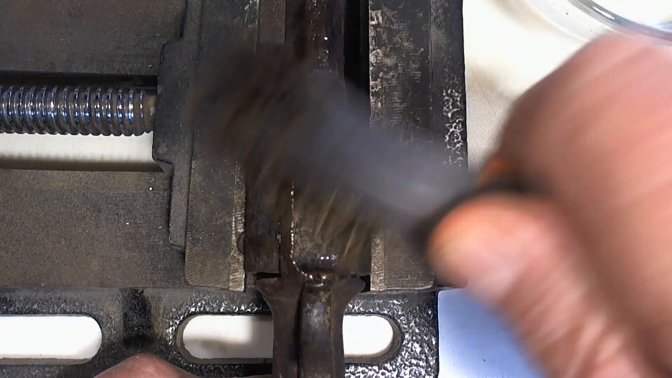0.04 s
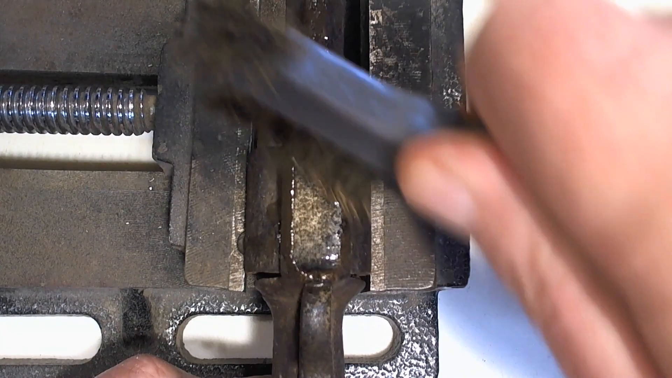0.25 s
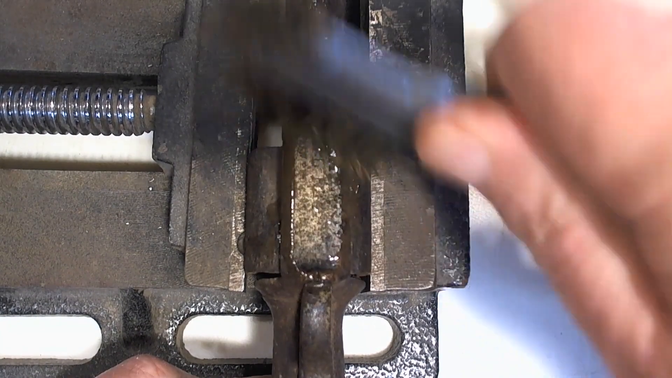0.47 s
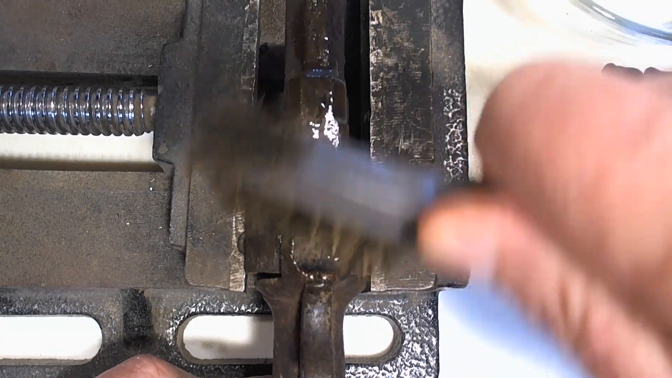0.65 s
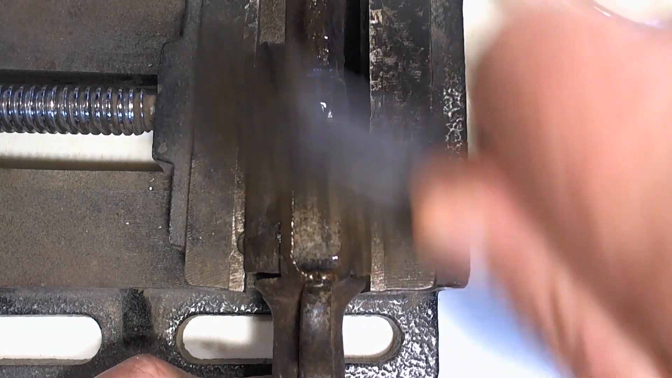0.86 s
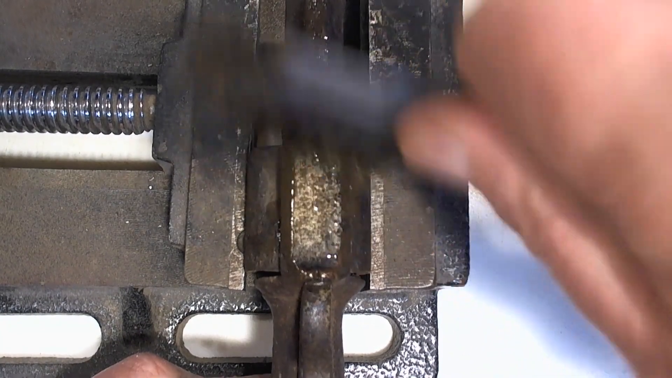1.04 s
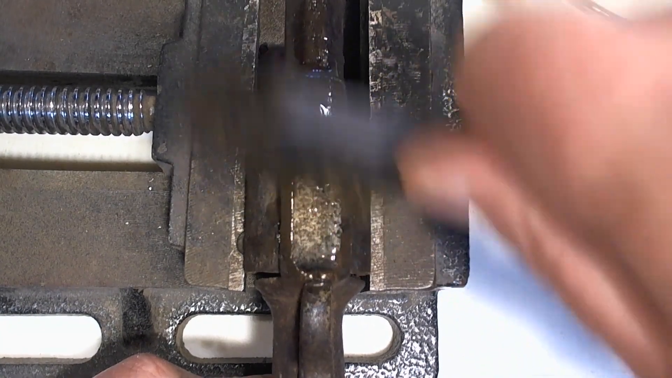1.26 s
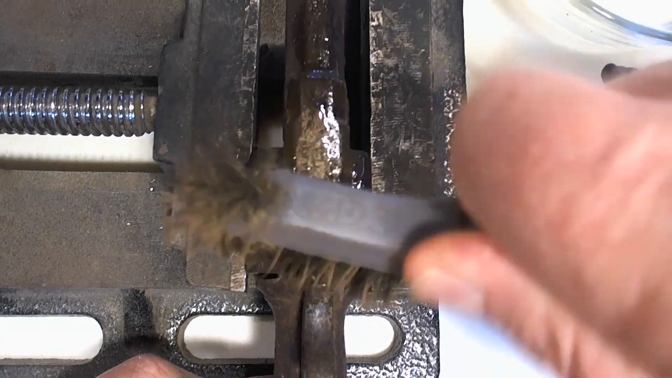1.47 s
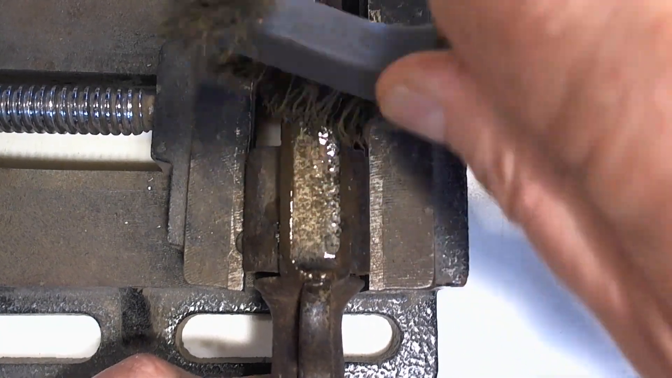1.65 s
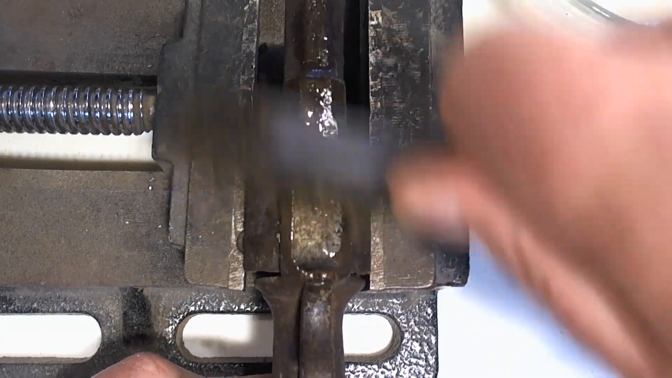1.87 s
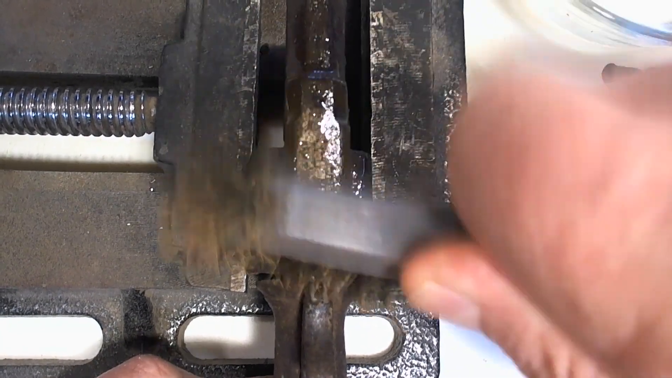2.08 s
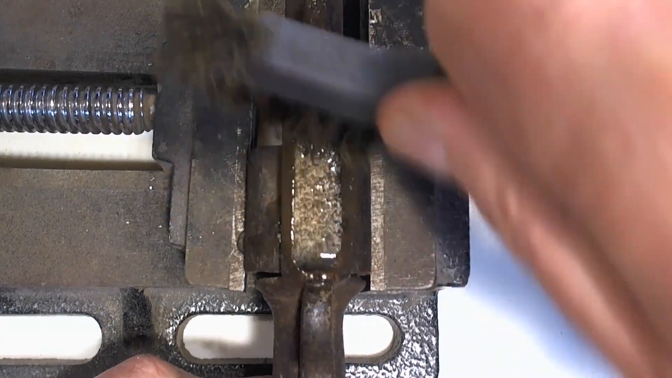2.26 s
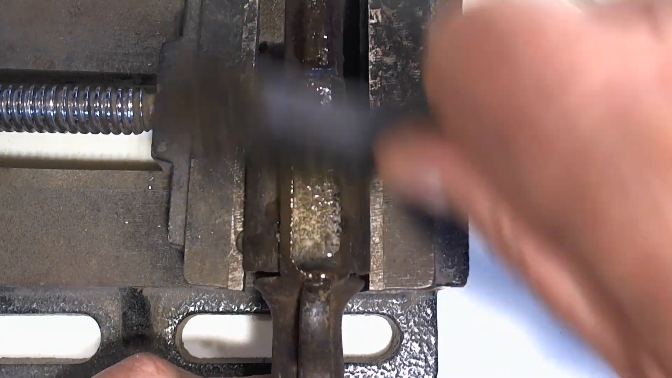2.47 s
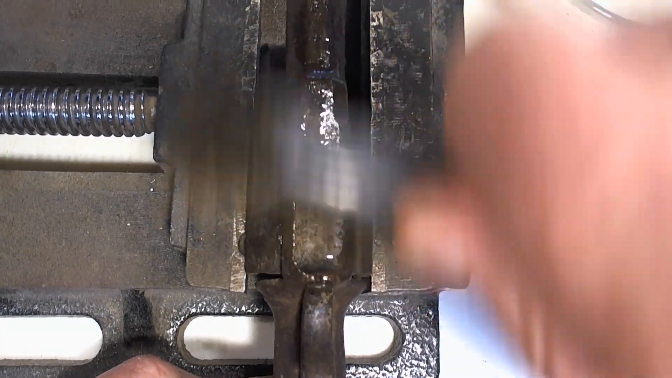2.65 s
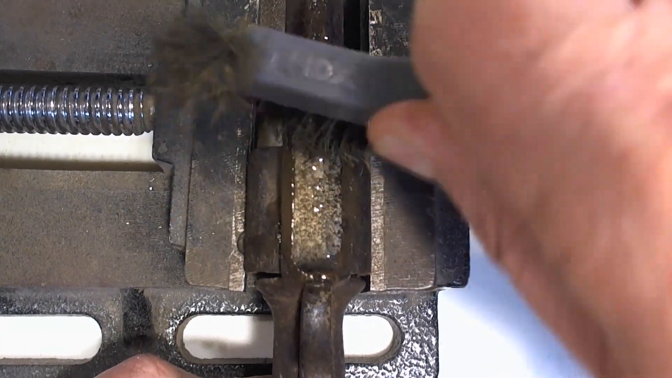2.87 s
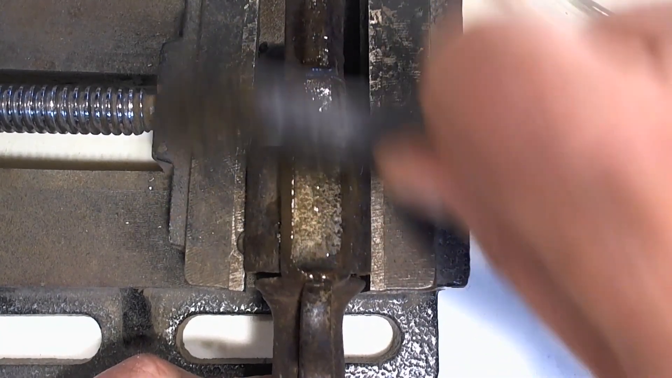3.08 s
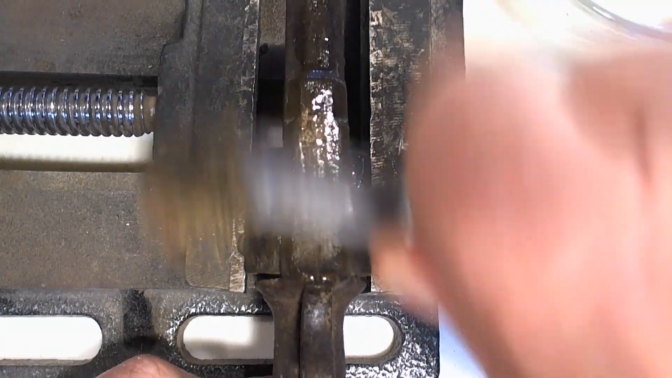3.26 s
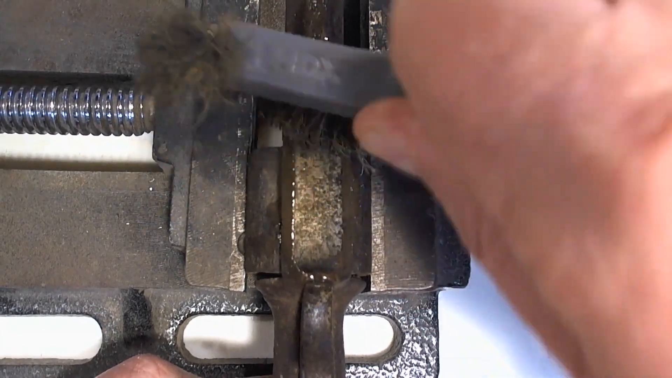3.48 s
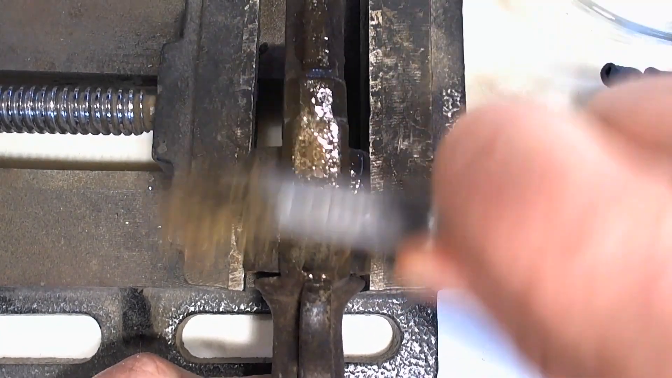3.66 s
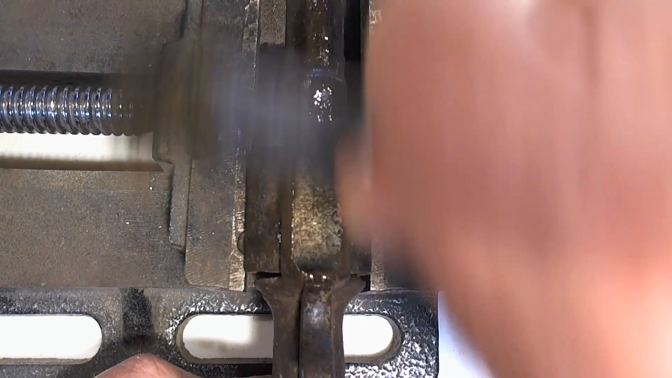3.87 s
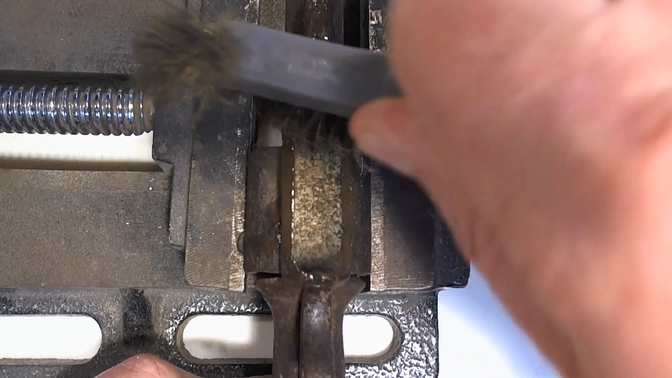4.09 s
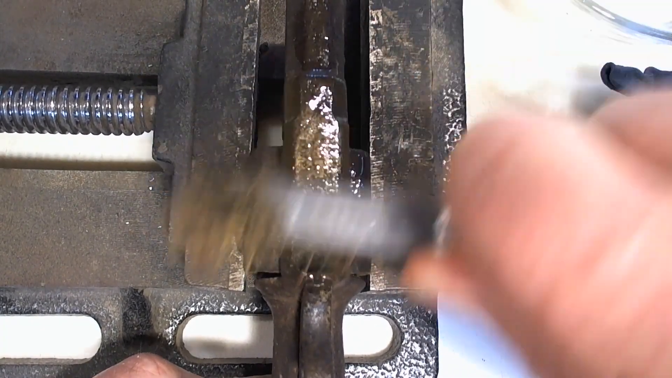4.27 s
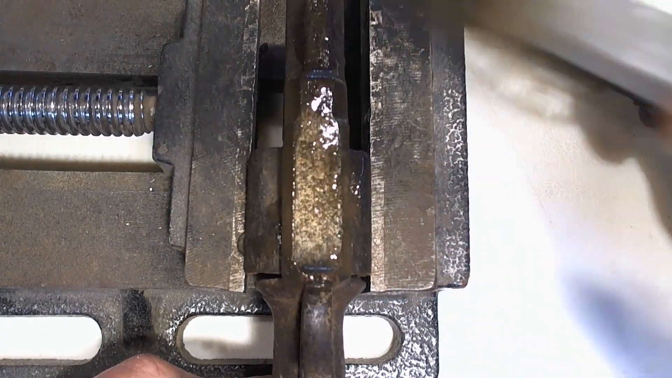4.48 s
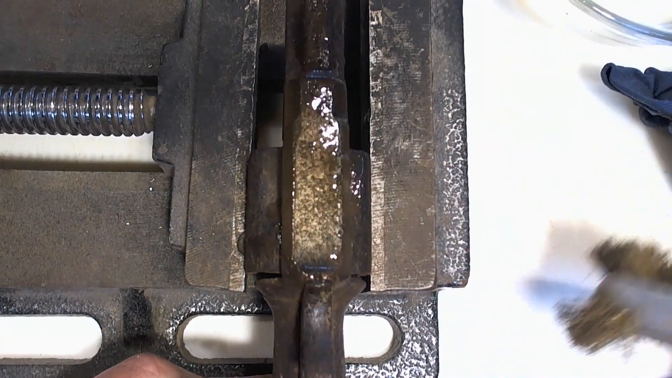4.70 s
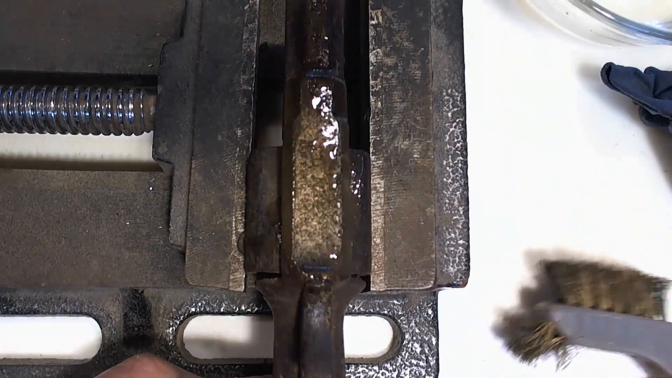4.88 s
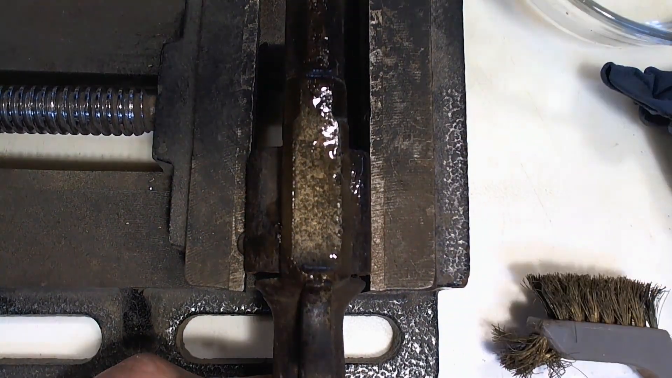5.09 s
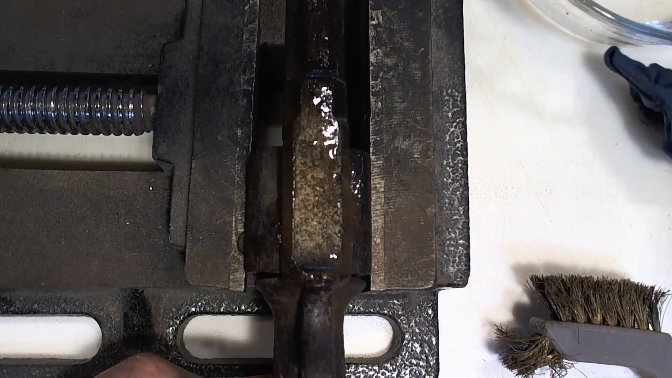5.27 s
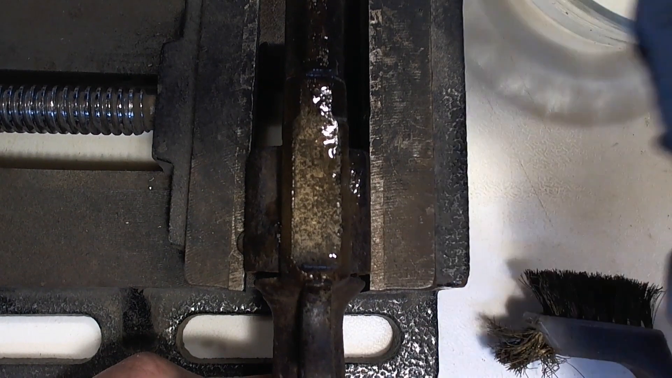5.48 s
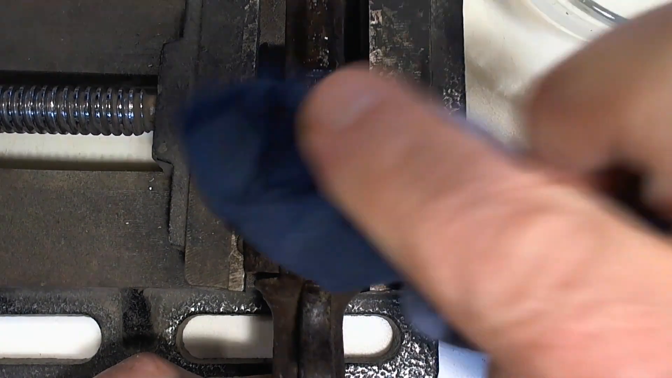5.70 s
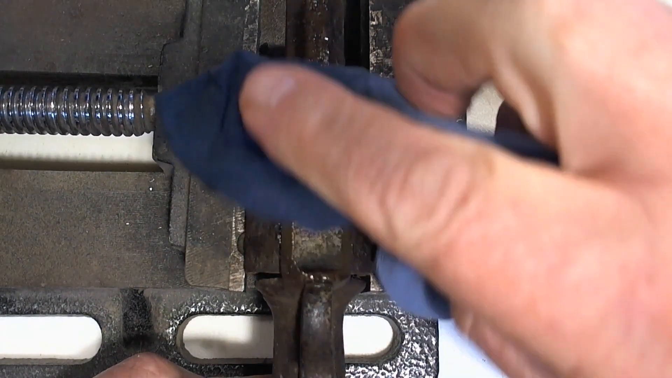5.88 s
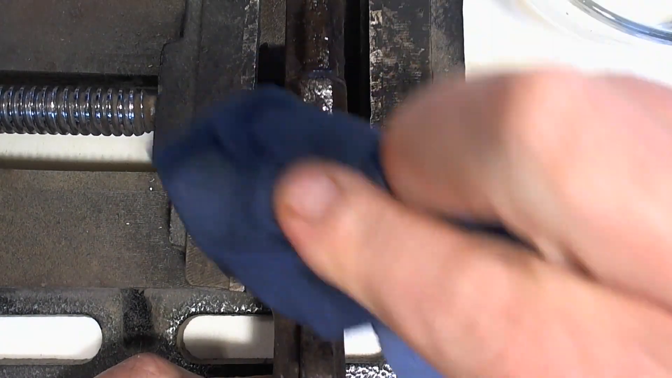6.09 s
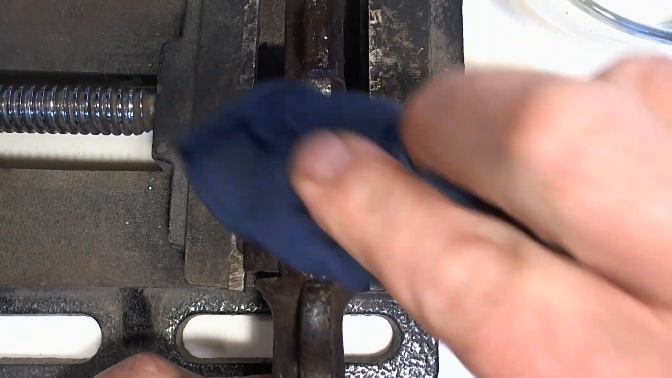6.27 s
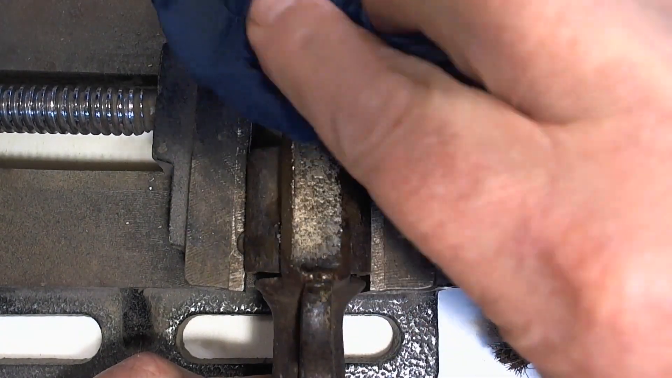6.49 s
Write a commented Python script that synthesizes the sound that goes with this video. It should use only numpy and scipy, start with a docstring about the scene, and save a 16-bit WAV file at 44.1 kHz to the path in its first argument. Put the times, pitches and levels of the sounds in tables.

```python
"""In a small workshop, close to the microphone, a steel wire brush scrubs a rusty metal part held in a vise.
Wire tips strike the rust as random impacts, spring free as tiny damped pings, and excite the modes of part,
vise and bench, stroke after stroke. The brush is laid down in bristle ticks and a rag, shaped impact noise,
is picked up; a hard knock, a sum of damped modes, sounds on the bench before the rag wipes the part.
Still air, as shaped noise, and a mains hum lie underneath."""
import sys
import numpy as np
from scipy import signal
from scipy.fft import rfft, irfft, next_fast_len
from scipy.io import wavfile
from scipy.ndimage import map_coordinates

SR = 44100
rng = np.random.default_rng(int(sys.argv[2]) if len(sys.argv) > 2 else 0)


def output_pcm(signal):
    """Save a mono or channel-first signal as 16-bit PCM at the path in sys.argv[1].

    Samples are clipped to [-1, 1] before scaling.
    """
    pcm = np.clip(np.atleast_2d(signal).T, -1, 1) * 32767
    wavfile.write(sys.argv[1], SR, np.round(pcm).astype(np.int16))


N = 288414  # length in samples


def amp(db):
    """Level to amplitude: twenty decibels to each factor of ten."""
    return 10 ** (np.asarray(db) / 20)


def unit(x):
    """Normalisation to a root-mean-square value of 1."""
    return x / np.sqrt(np.mean(x ** 2) + 1e-20)


def clock():
    """The time of every sample in seconds."""
    return np.arange(N) / SR


def along(points, hz):
    """Interpolation of (Hz, value) points on a logarithmic frequency axis."""
    f, v = np.transpose(points)
    return np.interp(np.log(hz + 1), np.log(f + 1), v)


def curves(rows):
    """Linear interpolation in time: one value per sample for each column after the time."""
    s, *cols = np.transpose(rows)
    return [np.interp(clock(), s, c) for c in cols]


def wobble(rate):
    """Slow random modulation: a smooth curve through random knots, rate of them a second."""
    knots = rng.standard_normal(int(N * rate / SR) + 4)
    return map_coordinates(knots, [clock() * rate])


def arch(s, length):
    """Half a sine: the speed of one sweep of the hand, from rest to rest."""
    return np.abs(np.sin(np.pi * np.clip((clock() - s) / length, 0, 1)))


def add(track, s, sound):
    """Superposition: mix a sound into a track at time s."""
    part = track[round(s * SR):][:len(sound)]
    part += sound[:len(part)]


def filtered(x, response):
    """Linear filtering: the spectrum of x times a complex response of frequency."""
    size = next_fast_len(N + SR // 2)
    return irfft(rfft(x, size) * response(np.fft.rfftfreq(size, 1 / SR)), size)[:N]


def coloured(x, spectrum):
    """Spectral shaping: x weighted by a curve of (Hz, dB) points, at rms 1."""
    return unit(filtered(x, lambda hz: amp(along(spectrum, hz))))


def catches(rate, spread_db):
    """Shot noise: random tiny impacts of uneven size and either sign, rate a second, at rms 1."""
    hit = rng.random(N) < rate / SR
    size = np.clip(rng.standard_normal(N), -2, 2)
    return unit(hit * rng.choice([-1, 1], N) * amp(spread_db * size))


def ring(hz, t60, attack):
    """Free decay of one struck mode: a sine that falls 60 dB in t60 seconds after a soft attack."""
    t = np.arange(SR // 5) / SR
    decay = np.exp(-np.log(1000) * t / t60)
    return np.sin(2 * np.pi * hz * t) * decay * (1 - np.exp(-t / attack))


def rung(x, modes, edge_hz):
    """Modal resonance: x drives (Hz, width, dB) modes, weak above an edge; white noise keeps its level."""
    def response(hz):
        body = sum(amp(db) * 1j * hz * w / (c * c - hz * hz + 1j * hz * w) for c, w, db in modes)
        body = body * signal.freqs(*signal.butter(8, 1, analog=True), hz / edge_hz)[1]
        return body / np.sqrt(np.mean(np.abs(body) ** 2))
    return filtered(x, response)


# Spectrum of the still air. Each row: frequency in Hz, relative density in dB.
AIR_SPECTRUM = [(12, -26), (20, -8), (92, -7.5), (131, -6.5), (152, -14), (182, -16), (415, -17.5),
                (483, -19.5), (534, -20), (605, -19.5), (703, -21.5), (6550, -30.5), (8000, -34),
                (10400, -68), (17600, -120)]


def workshop():
    """Stationary background: shaped air noise and a 120 Hz mains hum with slightly unsteady phase and level."""
    air = coloured(rng.standard_normal(N), AIR_SPECTRUM)
    hum = np.sin(2 * np.pi * 120 * clock() + 0.23 * wobble(3.6)) * amp(0.92 * wobble(2.9))
    return amp(-62.0) * air + amp(-64.5) * hum


def handling_bump():
    """Impulsive excitation: as a stroke ends, the brush handle bumps and the bench thumps in two damped low modes."""
    out = np.zeros(N)
    thump = amp(-37.0) * ring(122, t60=0.083, attack=0.0031)
    thump = thump + amp(-41) * ring(257, t60=0.049, attack=.003)
    add(out, .001, thump)
    return out


# Brush strokes, pull and push in turn. Each row: start in seconds, relative grinding level in dB,
# relative level of the wire pings in dB, centre pitch of the pings in Hz.
BRUSH_STROKES = [(0.028, -52, -57, 6400), (0.196, -45, -41, 6450), (0.34, -48, -47, 6700),
                 (0.452, -42, -42, 6300), (0.591, -47, -40.8, 6850), (0.737, -43, -38.5, 6530),
                 (0.877, -46.5, -40.4, 6600), (1.022, -42, -36, 6900), (1.155, -45, -40, 6530),
                 (1.312, -42, -34, 6680), (1.447, -46, -33.5, 6780), (1.606, -43, -29, 6490),
                 (1.751, -45.5, -33.7, 6400), (1.907, -44, -28.5, 6600), (2.041, -45.5, -34.5, 5820),
                 (2.205, -43.5, -29.5, 6700), (2.345, -45, -34.5, 5840), (2.505, -42.5, -29.5, 7000),
                 (2.669, -44.5, -35.7, 6660), (2.822, -44, -33, 6250), (2.979, -42.5, -29.5, 6960),
                 (3.124, -43.5, -36, 6730), (3.289, -42, -32, 7070), (3.443, -43.5, -36.5, 6650),
                 (3.593, -44, -32, 6750), (3.75, -41.5, -37.5, 5640), (3.896, -44, -32, 6750),
                 (4.074, -42, -37, 6460), (4.212, -48.5, -41.5, 6330)]
# How the contact changes as the hand shifts along the part. Each row: time in seconds,
# relative bench level in dB, relative ring of the part in dB, relative rustle at the turns in dB.
HAND_CONTACT = [(0.02, 6, 0, -57), (.42, 0.5, 0.5, -47), (1.1, -1, -1, -58.5), (1.8, 0, 2, -57),
                (2.35, -1, 0, -68), (2.9, -3, -2, -54), (3.35, -2, -6.5, -57.5), (3.75, -1.5, -1.5, -44.5),
                (4.25, -3.5, -3.5, -52.5)]
LIFT_OFF_S = 4.3  # the last stroke ends
PULL_PEAK, PUSH_PEAK = 0.44, 0.64  # share of a stroke gone by when the hand is fastest
PULL_SHAKE_DB, PUSH_SHAKE_DB = 0.37, 1.5  # shaking of the vise over the grinding
PUSH_BENCH_DB = 1  # pushes bear down harder on the bench
EASE_DB = -6  # the hand eases off before each push, so that turn is quieter


def scrubbing():
    """Stick-slip friction: force follows hand speed, which peaks later in pushes; pings grow fastest with it."""
    t = clock()
    start, grind_db, ping_db, ping_hz = np.transpose(BRUSH_STROKES)
    bench_db, part_db, turn_db = curves(HAND_CONTACT)
    push = np.arange(len(start)) % 2 == 1
    length = np.diff(np.r_[start, LIFT_OFF_S])
    fastest = start + length * np.where(push, PUSH_PEAK, PULL_PEAK)
    vise_db = grind_db + np.where(push, PUSH_SHAKE_DB, PULL_SHAKE_DB)
    # travel counts strokes: half of one up to the fastest point, half after it
    marks = np.sort(np.r_[start, fastest, LIFT_OFF_S])
    travel = np.interp(t, marks, np.arange(len(marks)) / 2)
    stroke = np.minimum(travel.astype(int), len(start) - 1)
    speed = np.abs(np.sin(np.pi * travel))
    # bent wires keep rustling while the hand turns round
    rustle = amp(turn_db + np.interp(t, start, EASE_DB * push)) * (t < LIFT_OFF_S)
    # whole tufts grip and let go together, most jerkily when the brush is slow
    grip = amp((1.44 - speed) * (1.73 * wobble(70) + 1.5 * wobble(420)))

    def force(db, power, turn):
        """Power law of speed, summed in energy with the rustle and modulated by the grip."""
        return grip * np.hypot(amp(db[stroke]) * speed ** power, turn * rustle)

    grind = force(grind_db, power=1.56, turn=0.64)
    shake = force(vise_db, power=1.24, turn=0.64)
    # the pings crest sharply in mid-stroke, where the wires bend furthest
    crest = 1 - np.abs(2 * (travel % 1) - 1)
    spring = amp(-3.5 + 3.26 * crest) * force(ping_db, power=2.3, turn=1.33)
    bench_gain = amp(bench_db + PUSH_BENCH_DB * push[stroke])
    return grinding(grind, part_db) + springing_wires(spring, ping_hz[stroke]) + shaking(shake, bench_gain)


# Spectrum of the grit. Each row: frequency in Hz, relative density in dB.
GRIT_SPECTRUM = [(30, -18.5), (200, -14), (900, -11.5), (1200, -7.5), (1800, -1), (2500, 0.5), (3300, 3.5),
                 (4400, 5.5), (5300, 1.5), (7400, -2), (9000, -13.5)]
# Modes of the clamped part. Each row: frequency in Hz, width in Hz, relative level in dB.
PART_MODES = [(1330, 37, -12.5), (1544, 160, -9.5), (2070, 130, -10), (2310, 150, -7.5), (2645, 210, -5),
              (3400, 110, -11), (3840, 62, -7.5), (4180, 95, -1.5), (4377, 99, 3)]


def grinding(grind, part_db):
    """Random impact excitation: wire tips break off rust and ring the modes of the part."""
    grit = amp(2.5) * grind * coloured(catches(rate=5000, spread_db=3.5), GRIT_SPECTRUM)
    strikes = grind * amp(part_db) * catches(rate=5000, spread_db=1.5)
    return grit + rung(strikes, PART_MODES, edge_hz=4940)


def pings(rate, pitch_hz, scatter, life, spread_db):
    """Elastic release: wires spring free as short damped sines scattered round a moving pitch, at rms 1."""
    count = int(rate * N / SR)
    start = rng.integers(0, N, count)
    pitch, size, hold = np.clip(rng.standard_normal((count, 3)), -2.2, 2.2).T[:, :, None]
    k = np.arange(256)  # samples in each ping
    hz = pitch_hz[start, None] * np.exp(scatter * pitch)
    wave = amp(spread_db * size) * np.sin(2 * np.pi * hz * k / SR)
    wave = wave * np.exp(-k / SR / (life * np.exp(0.32 * hold)))
    return unit(np.bincount((start[:, None] + k).ravel(), wave.ravel())[:N])


# Spectrum of the springing wires. Each row: frequency in Hz, relative density in dB.
WIRE_SPECTRUM = [(1500, -32), (3500, -1.5), (5000, -0.5), (6200, 3), (7400, 1.5), (9000, -3.5)]


def springing_wires(spring, pitch_hz):
    """Elastic release in number: a dense shower of pings, shaped in spectrum and following the stroke."""
    shower = pings(rate=3200, pitch_hz=pitch_hz, scatter=0.11, life=0.00053, spread_db=4.5)
    return spring * coloured(shower, WIRE_SPECTRUM)


# Modes of the vise. Each row: frequency in Hz, width in Hz, relative level in dB.
VISE_MODES = [(560, 6.8, -15.5), (608, 41.5, -1.5), (707, 29, -5), (767, 45, -6), (884, 77, -4),
              (938, 50, 0), (971, 47, 3.5), (973, 44, -7.5)]
# The jaw drones when the brush bears on the far end. Each row: time in seconds, relative level in dB.
JAW_DRONE = [(0, -26), (3.4, -19.5), (3.8, -7.5), (4.25, -10.5)]
# Low modes of the bench top. Each row: frequency in Hz, width in Hz, relative level in dB.
BENCH_MODES = [(42.6, 8.8, -2.5), (57, 14.4, 3), (118.3, 21, -1), (174.6, 23, 0.5), (230.6, 12.8, 2),
               (278, 13, 1), (301.6, 12, -2.5), (344, 44, -13.5), (397, 20, -19.5)]


def shaking(shake, bench_gain):
    """Structure-borne sound: the drag of the brush shakes the vise and its jaw and, through it, the bench."""
    vise_drive = amp(-1.0 + 1.54 * wobble(55)) * shake * catches(rate=5000, spread_db=2.5)
    vise = rung(vise_drive, VISE_MODES, edge_hz=980)
    jaw_drive = shake * amp(curves(JAW_DRONE)[0]) * catches(rate=3400, spread_db=4.5)
    jaw = rung(jaw_drive, [(607.4, 16, 0)], edge_hz=840)
    bench_drive = amp(-6.0) * shake * bench_gain * catches(rate=5000, spread_db=2.5)
    return vise + jaw + rung(bench_drive, BENCH_MODES, edge_hz=448)


# Single wires that snag and spring free. Each row: time in seconds (the snap follows 1.5 ms later),
# relative level in dB, pitch in Hz.
WIRE_FLICKS = [(0.0776, -21.5, 4500), (0.2443, -21.5, 4200), (0.7485, -31, 4440), (1.0285, -24, 4440),
               (1.332, -32, 4420), (1.4634, -25, 6240), (1.6352, -32, 6000), (1.8672, -18.5, 7000),
               (1.91, -31, 6150), (2.091, -14.5, 5870), (2.209, -24, 4970), (2.5274, -29, 5940),
               (2.8942, -11, 6360), (2.8979, -8.5, 6100), (3.1463, -31, 4350), (3.309, -27, 7300),
               (3.7539, -23.5, 5500), (4.0846, -27, 5800)]


def flicks():
    """Sudden release of stored energy: a snagged wire snaps with a tiny crack and rings a few milliseconds."""
    rings, cracks = np.zeros(N), np.zeros(N)
    t = np.arange(SR // 20) / SR
    for s, db, hz in WIRE_FLICKS:
        add(rings, s + 0.001497, amp(db + 0.5) * ring(hz, t60=0.0045, attack=0.00023))
        add(cracks, s + .0015, amp(db - 14) * np.exp(-t / 0.0018))
    return rings + cracks * coloured(rng.standard_normal(N), WIRE_SPECTRUM)


# Bristles brush past and drag on the bench. Each row: start in seconds, length in seconds, relative level in dB.
BRISTLE_DRAGS = [(4.462, .07, -52), (4.731, .125, -41), (4.942, .01, -40.5)]
# Spectrum of the bristles. Each row: frequency in Hz, relative density in dB.
BRISTLE_SPECTRUM = [(100, -21), (500, -31), (760, 7), (980, 7), (1250, -15), (1750, 6), (2300, -2.5),
                    (3800, 3.5), (6000, 6), (8000, -5)]
# from one bristle letting go to the next, the random shift of that moment, and each tick's decay
TICK_GAP_S, TICK_SCATTER_S, TICK_DECAY_S = .0145, 0.0027, 0.0049


def brush_laid_down():
    """Stick-slip release: bristles let go one by one and ring the vise, a wire sings, the brush bumps softly."""
    bursts, out = np.zeros(N), np.zeros(N)
    t = np.arange(SR // 10) / SR
    for start, length, db in BRISTLE_DRAGS:
        for s in np.arange(start, start + length, TICK_GAP_S):
            late, size = rng.standard_normal(2)
            shift = TICK_SCATTER_S * late * (s > start)  # the first tick is on time
            add(bursts, s + shift, amp(db - 5.5 + 0.97 * size) * np.exp(-t / TICK_DECAY_S))
    add(out, 4.911, amp(-49.0) * ring(2940, t60=0.07, attack=0.00099))  # the singing wire
    add(out, 4.922, amp(-43.0) * ring(164, t60=0.051, attack=.003))  # the bump
    vise_ring = rung(amp(-9) * bursts * rng.standard_normal(N), [(797, 42, 0), (920, 68, 0)], edge_hz=1140)
    bristles = amp(-1) * bursts * coloured(catches(rate=9900, spread_db=7), BRISTLE_SPECTRUM)
    return out + vise_ring + bristles


# The rag is picked up, then wipes to and fro. Each row: start in seconds, length in seconds,
# relative rub level in dB.
RAG_RUBS = [(5.133, .15, -55), (5.27, 0.32, -58.5), (5.638, 0.12, -57.5), (5.722, 0.17, -53.5),
            (5.92, 0.2, -48.5), (6.048, 0.33, -51.5), (6.225, 0.21, -44.5), (6.474, 0.19, -47.5)]
# Spectrum of the rag. Each row: frequency in Hz, relative density in dB.
RAG_SPECTRUM = [(40, -22), (120, -14), (170, 3.5), (260, -6), (450, -9.5), (900, -2.5), (1250, -8.5),
                (2000, -5), (3200, -1.5), (4400, -0.5), (5300, -2.5), (6600, -1.5), (8000, -12.5)]
# Faint squeaks as the rag turns round. Each row: start in seconds, length in seconds, pitch in Hz,
# relative level in dB.
RAG_SQUEAKS = [(5.857, 0.077, 3100, -64.5), (6.417, 0.096, 3160, -68)]
RUB_POWER = 0.79  # exponent of the rag's amplitude against hand speed


def wiping():
    """Sliding friction: rubs swell with hand speed; the cloth stirs the vise, bumps the bench, squeaks at turns."""
    rub = np.sqrt(sum((amp(db) * arch(s, length) ** RUB_POWER) ** 2 for s, length, db in RAG_RUBS))
    rub = rub * amp(1.15 * wobble(120) + 1.1 * wobble(30))
    fibres = amp(-0.5) * rub * coloured(catches(rate=9000, spread_db=3.5), RAG_SPECTRUM)
    vise_drive = amp(-18 + 4.6 * wobble(35)) * rub * rng.standard_normal(N)
    vise = rung(vise_drive, VISE_MODES, edge_hz=960)
    bumps = rung(amp(-14.5) * rub * catches(rate=60, spread_db=4), BENCH_MODES, edge_hz=450)
    squeaks = np.zeros(N)
    for s, length, hz, db in RAG_SQUEAKS:
        squeal = amp(db) * arch(s, length) * rng.standard_normal(N)
        squeaks += rung(squeal, [(hz, 110, 0)], edge_hz=4900)
    return fibres + vise + bumps + squeaks


# The knock and its early reflections. Each row: time in seconds, relative level in dB.
KNOCK_BLOWS = [(5.3521, -19), (5.365, -49), (5.374, -38)]
# Modes of the hard knock on the bench. Each row: frequency in Hz, relative level in dB,
# 60 dB decay time in seconds.
KNOCK_MODES = [(250, -13.5, 0.016), (814, -15.5, 0.077), (1014, -19.5, 0.051), (1660, -14, 0.034),
               (1950, -4, 0.014), (2564, 3, 0.019), (3920, 2.5, 0.0053)]


def knock():
    """Impact of hard bodies: well damped modes are struck, echo faintly in early reflections, and the vise is
    jolted."""
    out = np.zeros(N)
    for s, db in KNOCK_BLOWS:
        add(out, s, sum(amp(db + level) * ring(hz, t60, attack=0.0006) for hz, level, t60 in KNOCK_MODES))
    since = np.maximum(clock() - KNOCK_BLOWS[0][0], 0)
    jolt = amp(-43) * np.exp(-since / 0.02) * (since > 0)
    return out + rung(jolt * rng.standard_normal(N), VISE_MODES, edge_hz=900)


# Reverberation of the room. Each row: frequency in Hz, 60 dB decay time in seconds.
ROOM_DECAY = [(100, 0.31), (1000, 0.23), (4000, 0.07), (8000, 0.067)]


def room(x):
    """Diffuse reverberation: bench and walls answer after 5 ms with noise that decays at a rate set by frequency."""
    hz, t, z = signal.stft(rng.standard_normal(SR // 2), SR, nperseg=256)
    decay = amp(-60 * t / along(ROOM_DECAY, hz)[:, None])
    tail = signal.istft(z * decay, SR, nperseg=256)[1]
    tail = np.pad(tail, (SR // 200, 0)) / np.linalg.norm(tail)
    return signal.fftconvolve(x, tail)[:N]


def scene():
    """Superposition of the work, its reverberation and the background."""
    work = handling_bump() + scrubbing() + flicks() + brush_laid_down() + wiping() + knock()
    return (work + amp(-18.5) * room(work) + workshop())[None]


def record(dry):
    """Band limitation: the microphone path falls very steeply above 7680 Hz."""
    return filtered(dry[0], lambda hz: 1 / np.sqrt(1 + (hz / 7680) ** 110))[None]


dry = scene()
out = record(dry)
output_pcm(out)
```